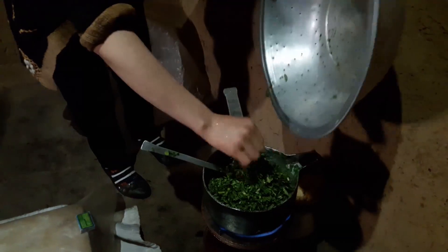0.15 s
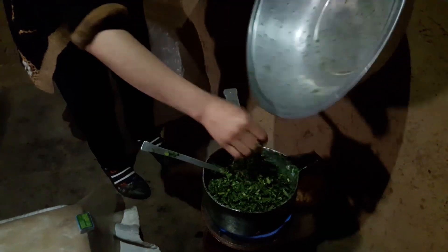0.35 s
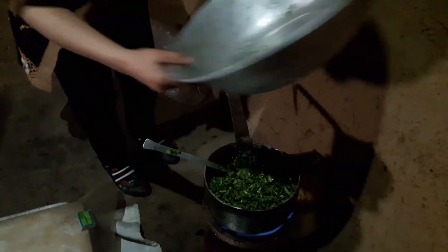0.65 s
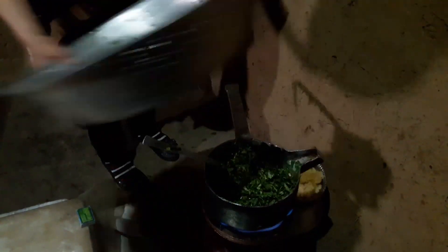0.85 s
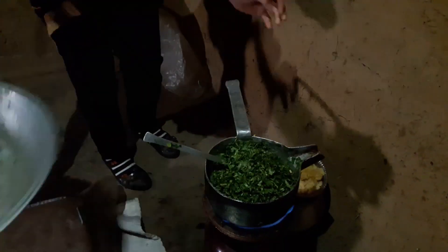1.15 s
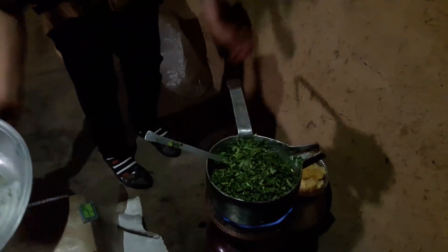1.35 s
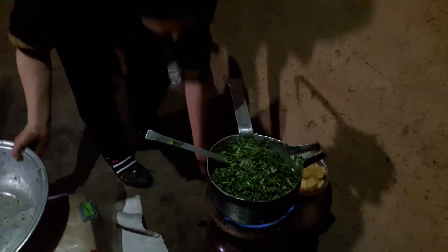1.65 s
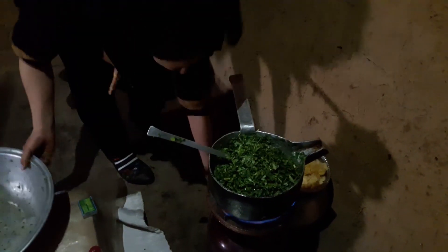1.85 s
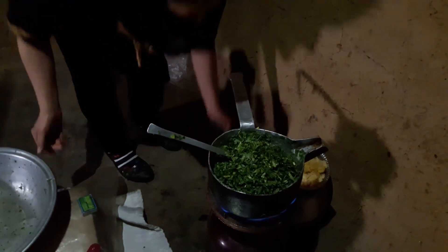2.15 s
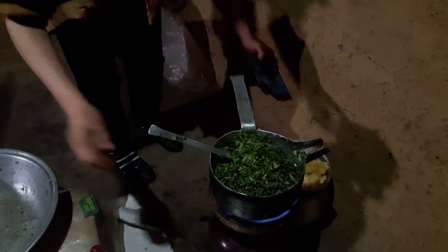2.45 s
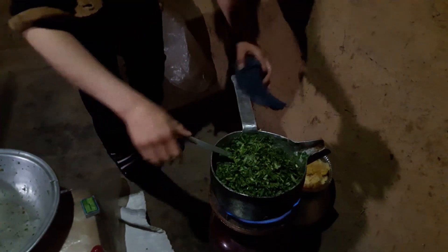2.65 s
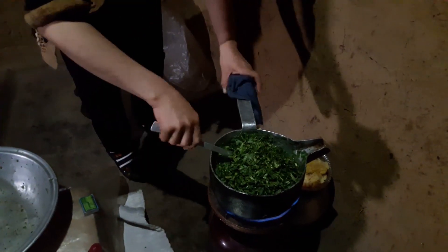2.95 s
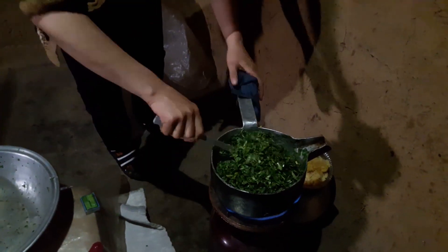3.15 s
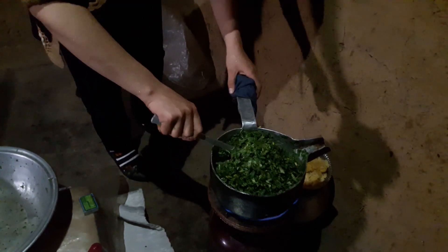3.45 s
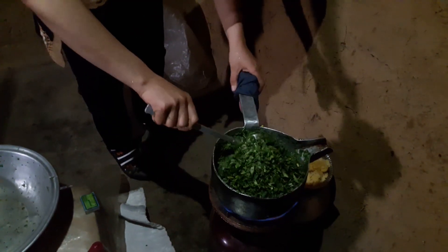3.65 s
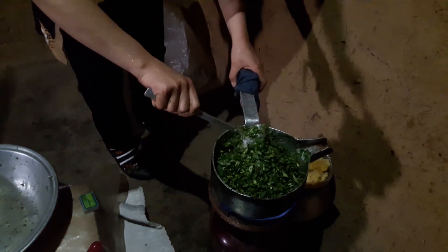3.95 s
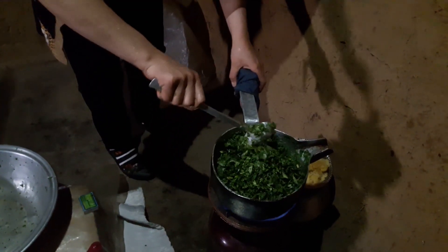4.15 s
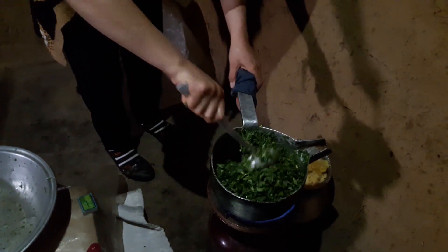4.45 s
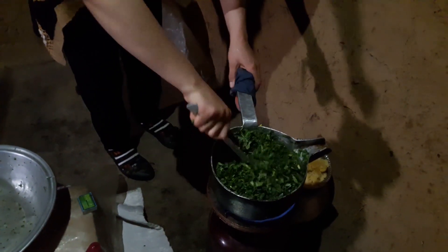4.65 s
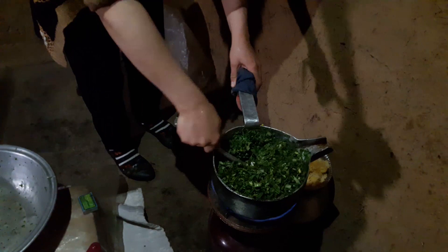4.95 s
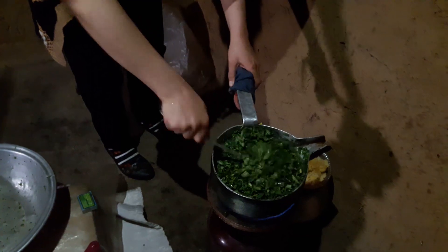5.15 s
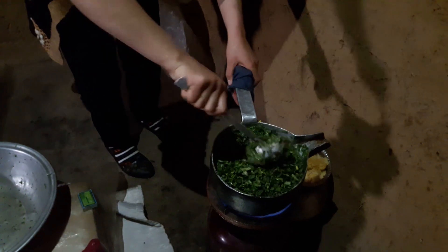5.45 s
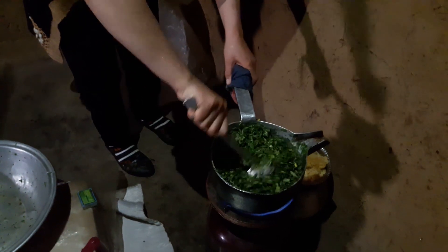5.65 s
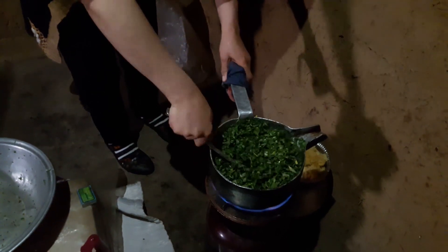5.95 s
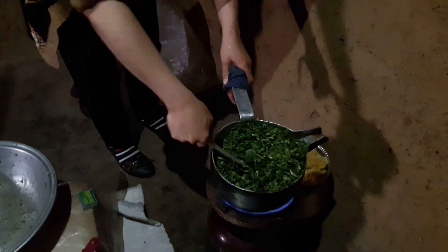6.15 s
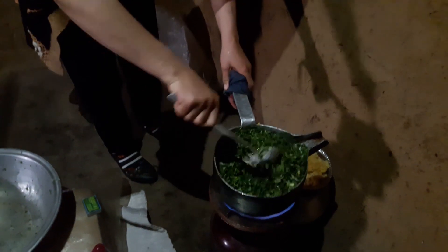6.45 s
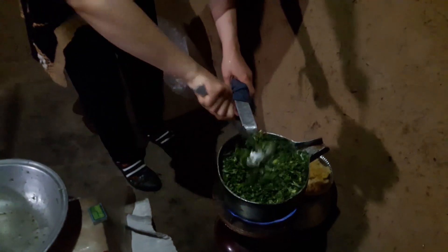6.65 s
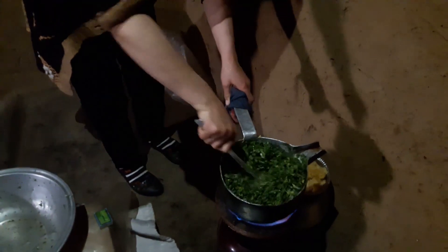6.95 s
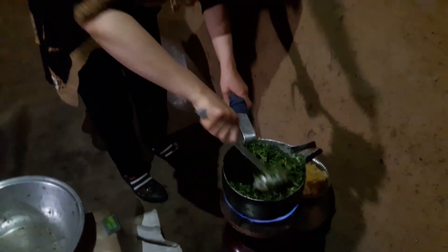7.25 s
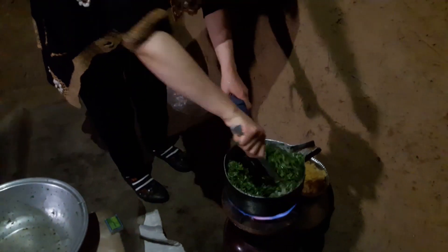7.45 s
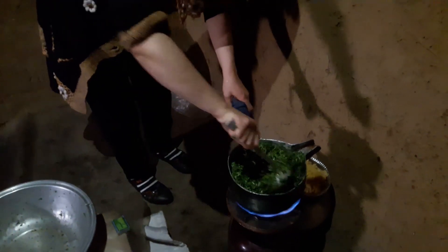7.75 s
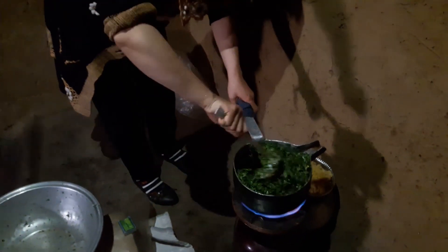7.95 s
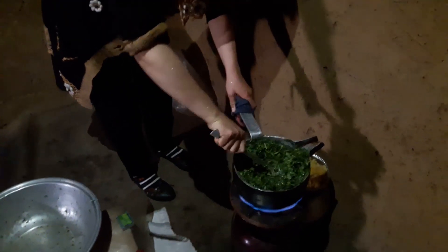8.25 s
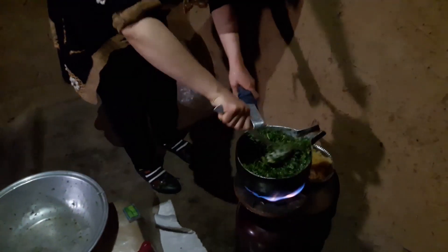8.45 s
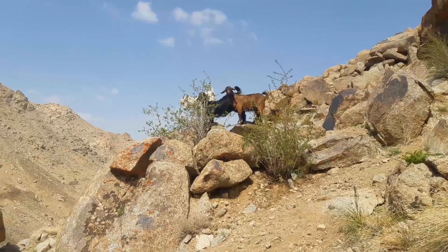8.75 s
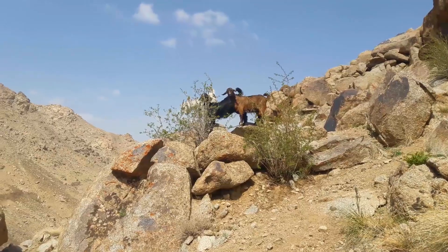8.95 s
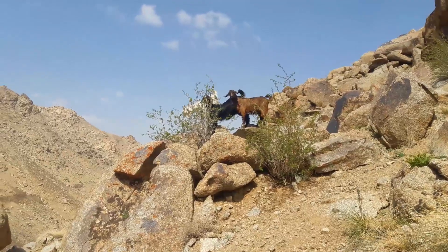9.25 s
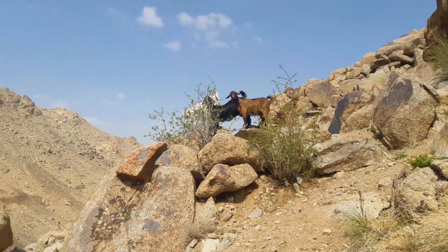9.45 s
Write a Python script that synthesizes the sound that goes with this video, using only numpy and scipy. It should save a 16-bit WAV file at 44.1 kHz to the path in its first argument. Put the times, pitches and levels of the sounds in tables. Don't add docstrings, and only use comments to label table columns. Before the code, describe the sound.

Greens sizzle in a pot over a steadily hissing gas burner in a hard, echoing room, with scuffs, thumps and three metallic ladle clangs.

```python
import sys
import numpy as np
from scipy import signal
from scipy.fft import rfft, irfft, next_fast_len
from scipy.io import wavfile
from scipy.ndimage import uniform_filter1d

SR = 44100
rng = np.random.default_rng(int(sys.argv[2]) if len(sys.argv) > 2 else 0)


def linear_from_db(decibels):
    return 10 ** (np.asarray(decibels, float) / 20)


def store_pcm(level_fs):
    pcm = np.round(np.clip(level_fs, -1, 1) * 32767).astype(np.int16)
    wavfile.write(sys.argv[1], SR, np.atleast_2d(pcm).T)


N = 422919

# delay in seconds, level in dB.
ECHOES = [(.008, -9.5), (0.015, -14), (.022, -12), (.032, -5.5), (.043, -9.5)]
# pitch in Hz, time in seconds.
ROOM_FADE = [(100, 0.78), (300, 0.43), (700, 0.6), (2000, 0.58), (5000, 0.65), (12000, 0.36)]
ROOM_DB = -1
# pitch in Hz, level in dB.
MICROPHONE = [(30, -27), (60, -9.5), (110, -2.5), (7250, 0.5), (7600, -11), (8100, -32), (8600, -28),
              (11000, -29.5), (15750, -28.5), (15900, -60)]
# pitch in Hz, level in dB per Hz.
CHANNEL_HISS = [(40, -8), (150, -4.5), (600, -4), (1500, -5.5), (2300, -5), (3200, -31), (9000, -33),
                (11000, -15), (13000, -20), (15500, -18)]
CHANNEL_HISS_DB = -74.5
ZERO_OFFSET = -0.00076

# start in seconds, level in dB, ring in Hz, ring level in dB, rub in seconds.
KNOCKS = [(.749, -45.5, 670, 12, 0.018), (1.159, -50, 632, 10, 0.01), (2.69, -38.5, 439, -4, 0.028),
          (3.842, -49, 382, -5, 0.017), (5.67, -47.5, 855, 2, .025), (6.075, -35.5, 705, 10, 0.0048),
          (8.149, -40, 2200, -5, 0.061)]
# start in seconds, level in dB, ring in Hz, treble level in dB, rub in seconds.
SCUFFS = [(0, -36.5, 1790, 5.5, 0.015), (1.604, -30, 1080, 13, 0.017), (1.86, -30.5, 1700, 7.5, 0.06),
          (6.206, -30.5, 1460, 13, .011), (6.25, -41, 900, 8, 0.0075)]
KNOCK_TREBLE_DB, SCUFF_RING_DB, RING_WIDTH_HZ = -18, -10, 58

# start in seconds, level in dB, body in Hz, floor boom in dB, click in dB.
THUMPS = [(1.614, -48.5, 239, -7, -11), (1.837, -46.5, 250.4, -25, 1.5), (1.93, -53, 240, -35, -5),
          (2.055, -48, 150, -23, -14), (2.058, -52, 256, -35, -20), (2.684, -49, 131.4, -35, -11),
          (2.988, -59, 267, -28, -12), (3.572, -50.5, 127, -12, -5), (3.843, -55.5, 385, -34, -13),
          (7.142, -40, 172, -9, -19), (8.297, -51, 179, -35, -1), (8.496, -39, 178, -27, -36)]
# start in seconds, level, body in Hz, floor boom in dB, click in dB.
JOLTS = [(5.843, -34, 284, -32, -22), (6.259, -51.5, 288, -11, -1), (7.446, -38, 430, -32, 2)]
THUMP_PUSH_S, JOLT_PUSH_S = 0.03, 0.0049

# start in seconds, level in dB, ring level in dB, rebound in seconds, rebound level in dB.
CLANGS = [
    (5.8325, -19.5, -13.5, 0.0041, 11),
    (7.4327, -16.5, -9, 0.0038, 2.5),
    (8.7368, -20.5, -8.5, .003, -2),
]
# pitch in Hz, level in dB per Hz.
CLANG_COLOURS = [
    [(180, -14), (300, -22), (543, -10), (835, -11), (922, -16), (1140, -11), (2210, -14.5), (3340, -16.5),
     (6150, -18), (8140, -42.5), (15500, -49)],
    [(180, -30), (300, -6.5), (863, -6), (1070, -30), (1840, -0.5), (3020, -4), (3400, -6), (5660, -12),
     (6150, -4), (8010, -33), (15500, -48)],
    [(180, -54), (300, -18), (631, -8), (1070, -16), (1440, -3), (2100, -8.5), (2610, -8.5), (4880, -9.5),
     (7020, -16.5), (8140, -42), (15500, -64)],
]
# pitch in Hz, width in Hz, level in dB.
CLANG_TONES = [
    [(1130, 44, -13), (2700, 93, 2), (3400, 110, 5), (4800, 69, -5), (5870, 30, 1), (6450, 85, 3)],
    [(1350, 42, -4), (1890, 56, -2), (3430, 73, 1), (4520, 98, -8), (5500, 50, -2), (6040, 78, -5)],
    [(2150, 41, 5), (2840, 136, -16), (3360, 35, -7), (4020, 110, 0), (5060, 49, -10), (5460, 54, -9)],
]
RATTLE_S = 0.0032

# time in seconds, level in dB.
GAS = [(0, 1.5), (.7, 0), (1.8, 0), (3.3, -2), (5.499, -1.5), (6.099, 1), (6.6, 0), (7.3, 1), (7.7, 4),
       (8.3, 3.5), (9.05, 0.5), (9.59, 1)]
# middle in seconds, length in seconds, strength in dB.
STROKES = [(.85, .6, 0.5), (1.85, 0.51, 3), (3.8, .4, 0), (4.75, 0.82, 4.5), (5.15, 0.91, 6), (5.7, 0.5, 3),
           (6.05, 0.95, 9.5), (6.85, 0.57, 4), (7.55, 0.34, 2), (8.85, 0.14, 2)]
# middle and length in seconds, strength in dB.
REACHES = [(1.2, .6, 3), (1.9, .7, 4), (5.0, 2.8, 6.5), (6.5, 2.7, 9), (8.2, 1.6, 0)]
# middle and length in seconds, strength in dB.
TILTS = [(6.7, 1.3, 11), (7.9, 0.87, 7.5)]
# middle and length in seconds, strength in dB.
SHIFTS = [(8.0, 2.4, 11), (9.2, 1.4, 8.5)]
WHISTLE_HZ, WHISTLE_HZ_PER_DB, WHISTLE_DB = 10200, -25, -73
SHRILL_HZ, SHRILL_DB = 11780, -86
SPLIT_HZ, SPLIT_DB = 9800, -94
RUSTLE_DB, RUSTLE_PER_STROKE = -77.5, .2

# pitch in Hz, level in dB per Hz.
FIRE_COLOUR = [(29, -44), (50, -9), (87, -23.5), (128, -8.5), (184, -12), (214, -16.5), (242, -16.5),
               (302, -9.5), (391, -16.5), (631, 0), (1490, -5), (1590, -4.5), (3000, 1), (3900, -30.5),
               (6600, -120)]
# pitch in Hz, level in dB per Hz.
JET_COLOUR = [(2400, -59), (2900, -19.5), (3300, -2), (3620, 4.5), (4050, -2), (4500, 3), (4800, 4.5),
              (5050, 5.5), (5300, -0.5), (5600, 2.5), (5900, 3.5), (6500, -3.5), (7200, -5), (8200, -14.5)]
# pitch in Hz, level in dB.
WALL_RINGS = [(3225, -68), (3666, -63), (3860, -64), (3924, -67), (3951, -66), (4323, -64), (4447, -63),
              (4753, -58), (4850, -58), (4985, -60), (5405, -64), (5459, -62), (5593, -61), (6153, -66)]
# level in dB, change in dB per dB of gas, change in dB per dB of stroke.
FIRE_LAYERS = [
    (-40.5, 0.14, -0.05),
    (-55.5, 0.2, .45),
    (-60.5, -0.44, 1.0),
    (-61, 0.45, 0.54),
]
HOLLOW_HZ, HOLLOW_WIDTH_HZ, HOLLOW_DB = 4670, 510, -17
NEAR_DB, FAR_DB = -3, -3


def colour(x, points):
    size = next_fast_len(x.shape[-1])
    hz, db = np.transpose(points)
    axis = np.maximum(np.arange(size // 2 + 1) * SR / size, 1)
    gain = linear_from_db(np.interp(np.log(axis), np.log(hz), db))
    return irfft(rfft(x, size) * gain, size)[..., :x.shape[-1]]


def band(x, lo_hz, hi_hz):
    sos = signal.butter(3, [lo_hz, min(hi_hz, .45 * SR)], "band", fs=SR, output="sos")
    return signal.sosfilt(sos, x)


def ring(x, hz, width_hz):
    return signal.lfilter(*signal.iirpeak(hz, hz / max(width_hz, 1), fs=SR), x)


def unit(x):
    return x / np.sqrt(np.mean(x ** 2))


def noise():
    return rng.standard_normal(N)


def even(answer):
    spectrum = rfft(answer, 2 * SR)
    total = np.cumsum(np.abs(spectrum) ** 2)
    k = np.arange(len(total))
    lo = (k * .92).astype(int)
    hi = np.minimum((k * 1.08).astype(int) + 20, k[-1])
    mean = (total[hi] - total[lo] + 1e-12) / np.maximum(hi - lo, 1)
    return irfft(spectrum / np.sqrt(mean))[:SR]


def burst(length_s):
    t = np.arange(SR // 2) / SR
    contact = rng.standard_normal(len(t)) * np.exp(-t / max(length_s, 1e-4))
    return even(contact)[:len(t)], t


def add(out, s, sound, db):
    i = int(s * SR)
    part = sound[:len(out) - i]
    out[i:i + len(part)] += part * linear_from_db(db) * np.sqrt(SR / 100 / np.sum(sound ** 2))


def walk(rate):
    k = int(SR / rate)
    held = np.repeat(rng.standard_normal(N // k + 1), k)
    return 0.79 * uniform_filter1d(uniform_filter1d(held, k), k)[:N]


def swells(rows):
    t = np.arange(0, N / SR + .02, .01)
    db = 0
    for middle_s, length_s, strength_db in rows:
        db = db + strength_db * np.cos(np.pi * np.clip((t - middle_s) / length_s, -.5, .5)) ** 2
    return np.interp(np.arange(N) / SR, t, db)


def gas():
    return np.interp(np.arange(N) / SR, *np.transpose(GAS))


def channel_hiss():
    return unit(colour(noise(), CHANNEL_HISS)) * linear_from_db(CHANNEL_HISS_DB)


def room():
    t = np.arange(SR) / SR
    hz, fade_s = np.transpose(ROOM_FADE)
    tail = 0
    for centre in 44 * 2. ** np.arange(9):
        decay = np.exp(-np.log(1000) * t / np.interp(np.log(centre), np.log(hz), fade_s))
        tail = tail + band(rng.standard_normal(SR), centre / 2 ** .5, centre * 2 ** .5) * decay
    tail *= 1 - np.exp(-t / 0.002)
    answer = linear_from_db(ROOM_DB) * tail / np.sqrt(np.sum(tail ** 2))
    answer[0] += 1
    for s, db in ECHOES:
        smear = burst(.003)[0]
        add(answer, s, smear, db - 10 * np.log10(SR / 100))
    return even(answer)


def taps():
    out = np.zeros(N)
    rows = [(s, db, hz, ring_db, KNOCK_TREBLE_DB, rub_s) for s, db, hz, ring_db, rub_s in KNOCKS]
    rows += [(s, db, hz, SCUFF_RING_DB, treble_db, rub_s) for s, db, hz, treble_db, rub_s in SCUFFS]
    for s, db, hz, ring_db, treble_db, rub_s in sorted(rows):
        rub, t = burst(rub_s)
        rub = rub * (1 - np.exp(-t / 0.0033))
        tone = linear_from_db(ring_db) * unit(ring(rub, hz, RING_WIDTH_HZ))
        scrape = unit(band(rub, 350, 3550))
        scratch = linear_from_db(treble_db) * unit(band(rub, 8500, 14000))
        add(out, s, tone + scrape + scratch, db)
    return out


def thumps():
    out = np.zeros(N)
    for rows, push_s in ((THUMPS, THUMP_PUSH_S), (JOLTS, JOLT_PUSH_S)):
        for s, db, hz, boom_db, click_db in rows:
            push, _ = burst(push_s)
            body = unit(ring(push, hz, 0.18 * hz)) + 0.69 * unit(band(push, 96, 433))
            boom = linear_from_db(boom_db + 4.5) * unit(band(push, 48, 73))
            click = linear_from_db(click_db) * unit(band(push, 260, 4200))
            add(out, s, body + boom + click, db + 8.5)
    return out


def clangs():
    out = np.zeros(N)
    undo_mic = [(7300, 0), (8100, 31), (12500, 31), (15500, 25)]
    for row, points, tones in zip(CLANGS, CLANG_COLOURS, CLANG_TONES):
        s, db, ring_db, rebound_s, rebound_db = row
        strike = burst(RATTLE_S)[0]
        rebound = np.roll(burst(RATTLE_S)[0], int(rebound_s * SR))
        crack = even(strike + linear_from_db(rebound_db) * rebound)
        rings = sum(linear_from_db(tone_db) * unit(ring(crack, hz, 2 * width)) for hz, width, tone_db in tones)
        lead = np.pad(crack, (SR // 10, 0))
        coloured = colour(colour(lead, points), undo_mic)[SR // 10:]
        add(out, s, unit(coloured) + linear_from_db(ring_db) * unit(rings), db)
    return out


def nozzle():
    slow = signal.lfilter([1], [1, -.972], rng.standard_normal((2, N)))
    turn = 2 * np.pi * np.cumsum(WHISTLE_HZ + WHISTLE_HZ_PER_DB * gas()) / SR
    breathy = slow[0] * np.cos(turn) + slow[1] * np.sin(turn)
    low = unit(breathy) * linear_from_db(WHISTLE_DB - 4.5 + gas())
    high = unit(ring(noise(), SHRILL_HZ, 230)) * linear_from_db(SHRILL_DB + swells(REACHES))
    split = unit(ring(noise(), SPLIT_HZ, 260)) * linear_from_db(SPLIT_DB + swells(TILTS))
    rustle = unit(band(noise(), 7300, 17000)) * linear_from_db(walk(16))
    rustle = rustle * linear_from_db(RUSTLE_DB - 3.5 + RUSTLE_PER_STROKE * swells(STROKES))
    return linear_from_db(33) * (low + high + split + rustle)


def steam_pops():
    sizes = np.minimum(rng.exponential(size=N), 6)
    return (rng.random(N) < 900 / SR) * linear_from_db(2.5 * sizes) * noise()


def fire(wall_db=None):
    push = noise() + 0.19 * unit(steam_pops())
    wide = colour(push, FIRE_COLOUR)
    low = colour(wide, [(1300, 0), (1700, -30)])
    lower = colour(wide, [(430, 0), (570, -30)])
    hollow = unit(ring(push, HOLLOW_HZ, HOLLOW_WIDTH_HZ))
    jet = unit(colour(push, JET_COLOUR)) + linear_from_db(HOLLOW_DB + swells(SHIFTS)) * hollow
    if wall_db is not None:
        wall = sum(linear_from_db(db) * ring(push, hz, 18) for hz, db in WALL_RINGS)
        jet = jet + linear_from_db(wall_db) * unit(wall)
    swell = walk(2.4)
    flow, stir = gas(), swells(STROKES)
    out = 0
    for part, (db, per_gas, per_stroke) in zip([jet, wide - low, low - lower, lower], FIRE_LAYERS):
        level = db + per_gas * flow + per_stroke * stir
        out = out + unit(part) * linear_from_db(level + 0.19 * swell + 1.32 * walk(12))
    return out


def scene():
    here = room()
    far = fire() * linear_from_db(FAR_DB)
    near = fire(wall_db=0) * linear_from_db(NEAR_DB) + nozzle()
    earlier = far[SR // 2:0:-1]
    dry = np.concatenate([earlier, far + thumps() + taps() + clangs()])
    mid = signal.fftconvolve(dry, here)[SR // 2:SR // 2 + N] + near
    side = channel_hiss()
    return np.array([mid + side, mid - side])


def top_cut(x):
    return signal.sosfilt(signal.butter(12, 15730, fs=SR, output="sos"), x)


def record(dry):
    side = (dry[0] - dry[1]) / 2
    mid = colour((dry[0] + dry[1]) / 2, MICROPHONE) + ZERO_OFFSET
    return top_cut(np.array([mid + side, mid - side]))


dry = scene()
out = record(dry)
store_pcm(out)
```